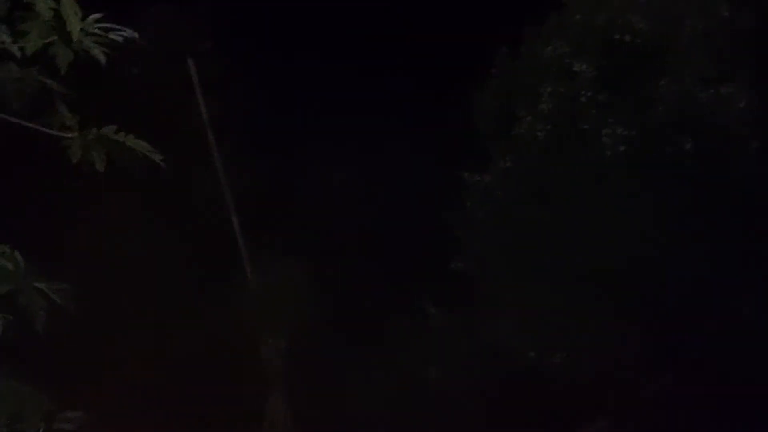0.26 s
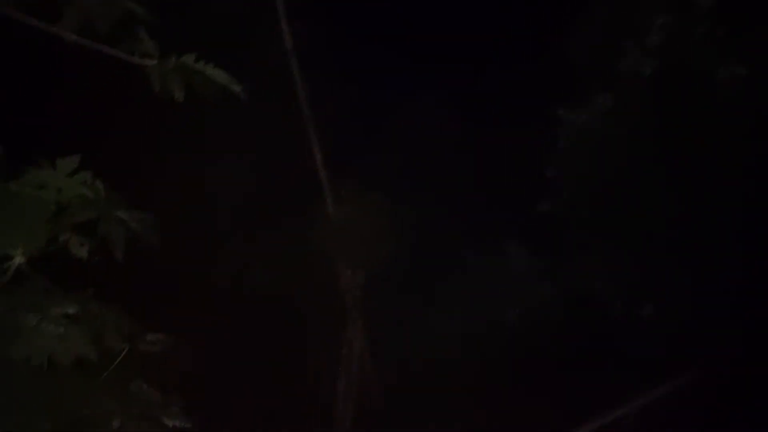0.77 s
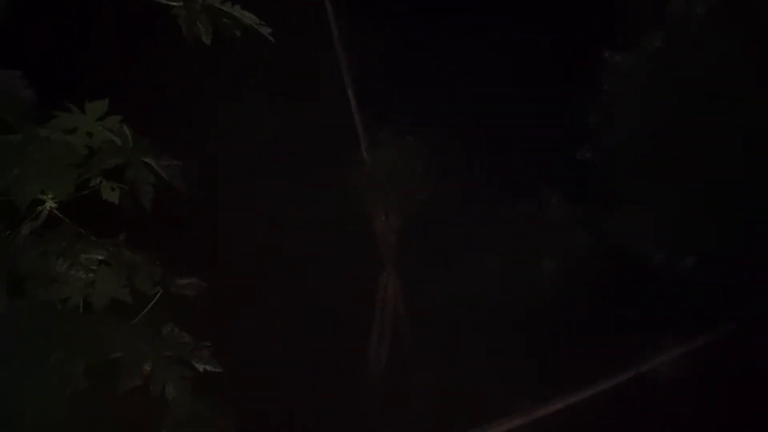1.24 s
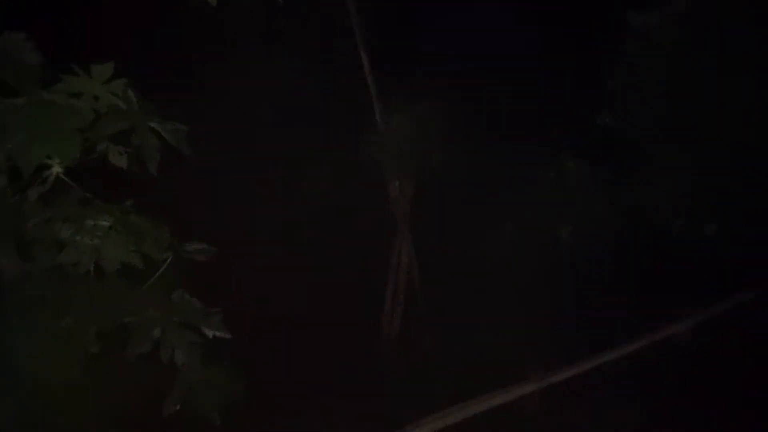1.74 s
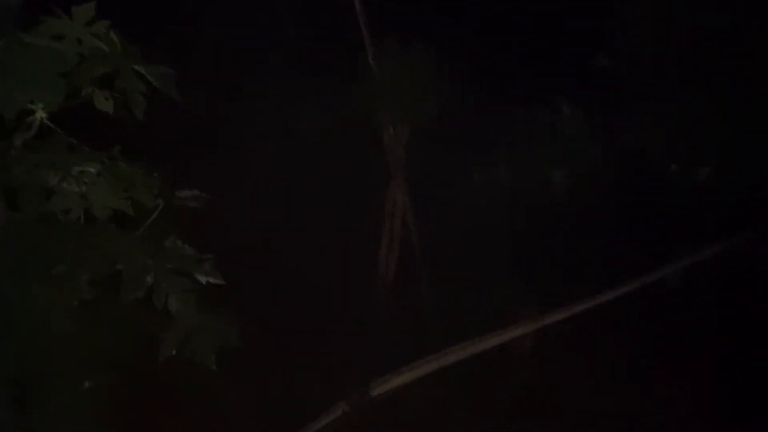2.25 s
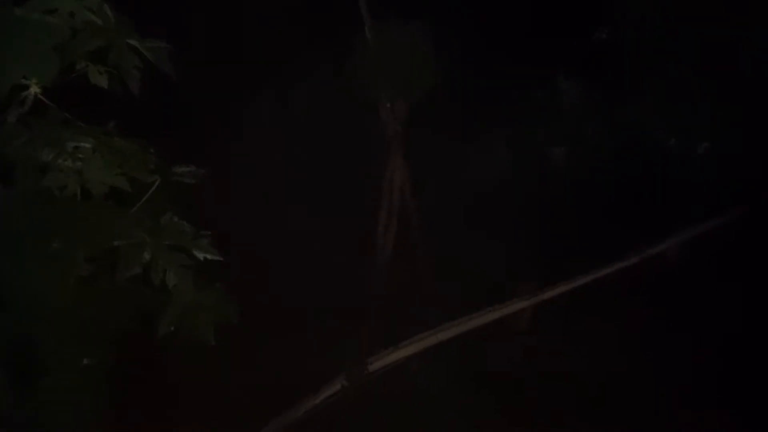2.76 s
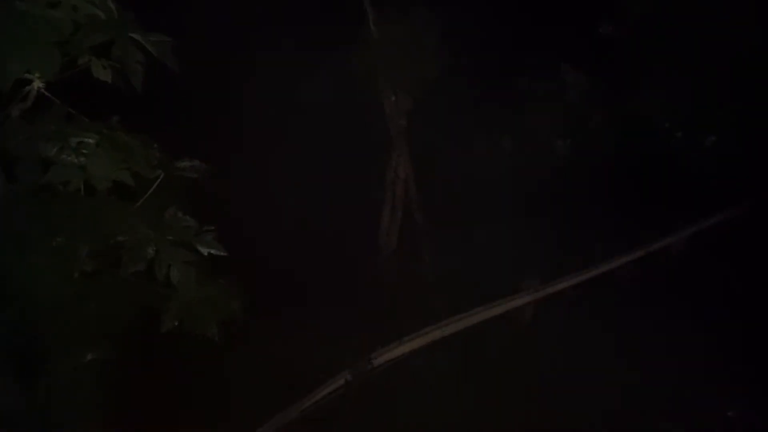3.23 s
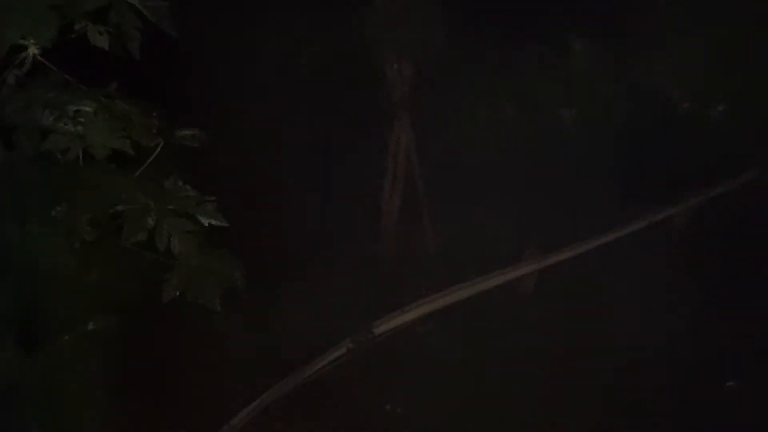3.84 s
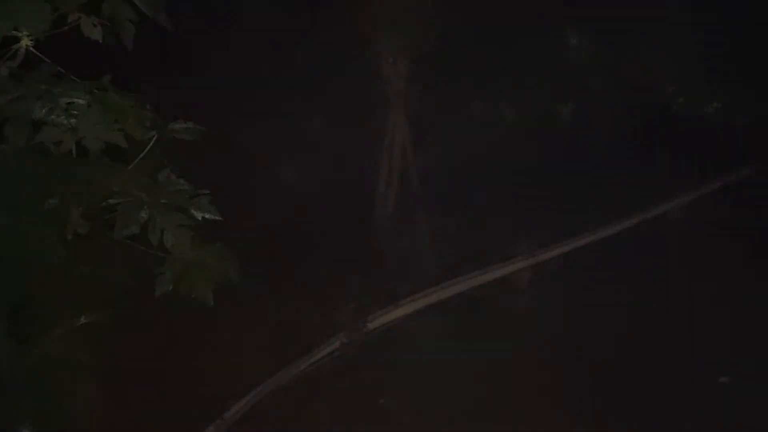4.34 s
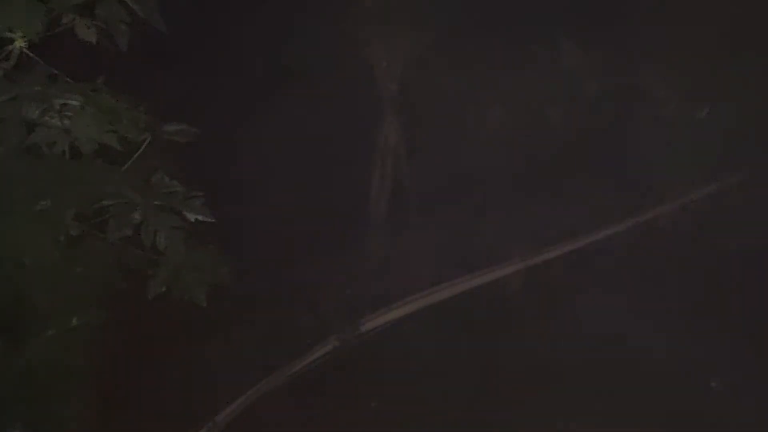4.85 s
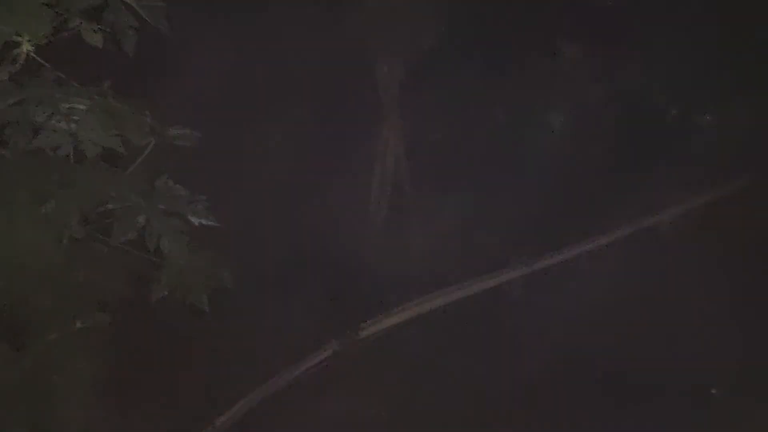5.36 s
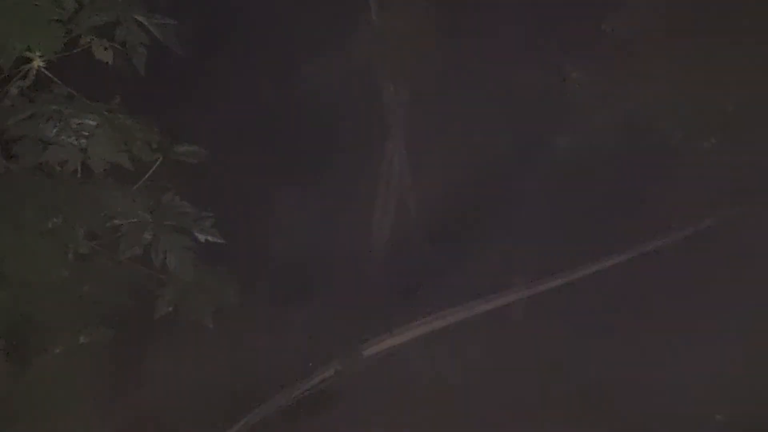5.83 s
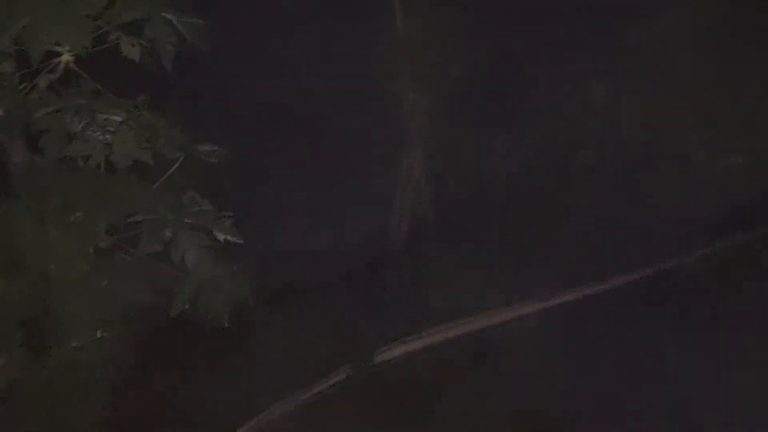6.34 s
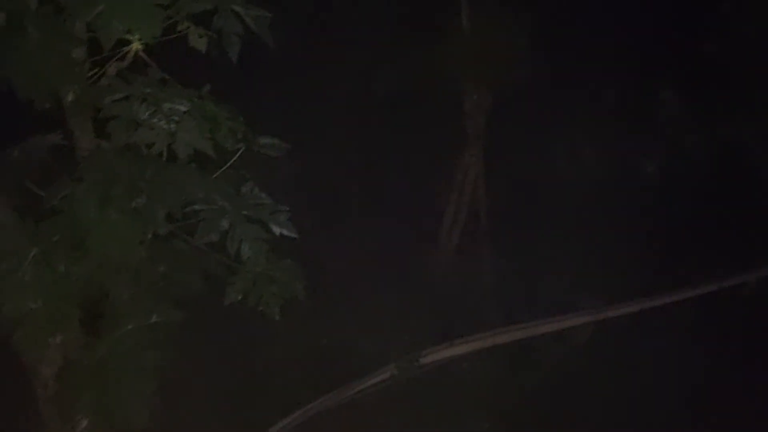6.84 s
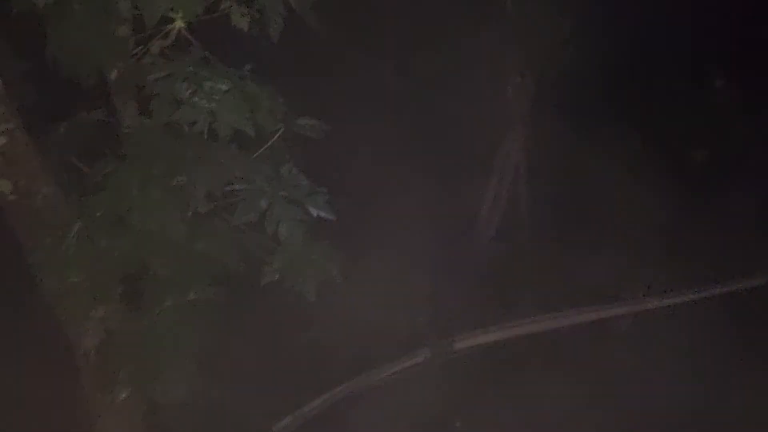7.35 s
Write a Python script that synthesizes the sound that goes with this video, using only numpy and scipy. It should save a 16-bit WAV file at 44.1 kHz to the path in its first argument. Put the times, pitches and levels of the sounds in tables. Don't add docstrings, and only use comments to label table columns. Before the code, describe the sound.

Night in a leafy garden, with a low machine hum throbbing about three times a second under air hiss and a blurred far cricket chorus. A loud buzz opens, with pairs and threes of clear peeps until 0.8 s. From 0.6 to 1.4 s a fast, slightly distant trill sounds; it returns nearer at 1.9-3.0, 3.5-5.0 and 5.4-7.1 s. Piercing four-stroke chirps alternate between two high crickets at about 0.9, 1.7, 3.3, 4.0, 5.7 and 6.3 s. Dry, papery katydid rasps scratch irregularly throughout. A middle-high chirper gives short falling strokes from 2.0 to 3.0 s. Quick sharp ticks come at 4.3-4.6 s, as the hum swells and a soft far knock sounds; buzzing pulses strengthen until 7.1 s. Faint peeps at 5.0-5.4 s return loudest at 7.1-7.5 s beside a thin passing trill. Soft low fluttering notes recur throughout. Most near singers lean right.

```python
import sys
import numpy as np
from scipy import signal
from scipy.fft import rfft, irfft, next_fast_len
from scipy.io import wavfile

SR = 44100
rng = np.random.default_rng(int(sys.argv[2]) if len(sys.argv) > 2 else 0)


def wrap_up_sound(samples):
    columns = np.atleast_2d(samples).T
    tamed = np.clip(columns, -1, 1)
    steps = np.round(tamed * 32767).astype(np.int16)
    wavfile.write(sys.argv[1], SR, steps)


def voltage_ratio(decibels):
    exponent = np.asarray(decibels, float) / 20
    return 10 ** exponent


N = 334703
TIME = np.arange(N) / SR
FAST = next_fast_len(N)

# (frequency [Hz], density [dB per Hz])
AIR_SPECTRUM = [(25, -41), (40, -13), (118, -6.5), (300, -14), (600, -24), (1130, -30), (2550, -35.5),
                (4000, -31.5), (7000, -24), (12000, -22), (16000, -31)]
# (frequency [Hz], left minus right [dB])
BACKGROUND_BALANCE = [(60, -9), (110, -6), (200, -2.5), (380, 0), (700, 0.5), (1290, 0), (2380, 9),
                      (4400, 2), (8120, -6), (15000, -14)]
# (frequency [Hz], width [Hz], level [dB])
HUM_LINES = [(50.2, 6, -73), (96, 30, -72.5), (126.4, 11.3, -68.5), (201.8, 14, -79.5), (257, 19.4, -78)]
# (frequency [Hz], throb rate [1/s], first peak [s], depth [0-1])
MACHINE_THROB = (104.1, 3.03, .075, .6)
# (time [s], level [dB])
MACHINE_LOAD = [(0, 4.5), (.3, 0.5), (1.0, 2), (1.5, -0.9), (3.6, -1.5), (4.35, 6.5), (5.0, -2),
                (5.8, -2.5), (6.4, 3.5), (7.3, -6), (7.59, -1)]
# (centre [s], level [dB])
KNOCKS = [
    (4.5, -61.5),
    (6.75, -62.5),
]
# (frequency [Hz], width [Hz], stroke rate [1/s], level [dB], left minus right [dB])
CHORUS_SINGERS = [(9324, 1010, 128, -58.5, -4.5), (4674, 490, 45, -66.5, -16), (5430, 1200, 60, -64.5, -8),
                  (4320, 1200, 63, -71, 3), (6300, 720, 87, -73.5, -6), (2100, 570, 40, -83, -7)]
# (time [s], level [dB])
FAR_TRILLERS = [(0, -60), (.46, -68), (.85, -56.5), (1.1, -61), (1.77, -70), (2.0, -59), (2.9, -64.5),
                (3.06, -73.5), (3.45, -70.5), (3.55, -59), (4.7, -65.5), (5.32, -63.5), (5.6, -65),
                (7.1, -59), (7.3, -78), (7.59, -71.5)]
# (first [s], last [s], gap [ms], level [dB])
BUZZ_RUNS = [
    (-.014, -.014, 270, -50),
    (.338, 1.511, 390, -69),
    (1.941, 3.902, 280, -69),
    (4.366, 4.366, 270, -54.5),
    (4.607, 5.432, 275, -53),
    (5.691, 6.499, 269, -51),
    (6.778, 7.064, 286, -54),
]
# (centre [s], level [dB])
FAR_CHIRPS = [(.02, -56), (.3, -60), (.56, -61), (.82, -56.5), (1.05, -58.5), (7.12, -65), (7.55, -73)]
# (centre [s], level [dB])
TREE_NOTES = [(0.151, -64), (0.397, -70), (0.729, -65.5), (0.999, -69), (1.329, -66), (1.65, -76.5),
              (1.982, -77), (2.325, -71), (2.663, -68), (2.976, -75), (3.261, -76), (3.63, -72),
              (3.919, -73.5), (4.236, -71), (4.587, -70.5), (4.895, -71), (5.232, -72), (5.54, -67),
              (5.858, -69.5), (6.18, -64), (6.494, -73), (6.749, -70), (7.04, -74), (7.376, -75)]
# (centre [s], level [dB], length [s])
THIN_TRILL = (7.17, -62, 0.34)
# (first [s], last [s], gap [ms], level [dB], left minus right [dB])
PEEP_RUNS = [
    (.022, .154, 132, -52, -7.5),
    (.283, .412, 129, -49, -7),
    (.543, .81, 133, -46.5, -11),
    (5.03, 5.15, 120, -55, -9),
    (5.223, 5.359, 136, -52, -11),
    (7.1, 7.234, 134, -43.5, -12.5),
    (7.369, 7.501, 132, -45.5, -13),
]
# (centre [s], level [dB], length [s], outer resonances relative to the middle [dB])
RASPS = [(0.034, -62, 0.18, 4), (0.297, -55.5, .12, 1), (.444, -64, 0.11, 3), (.808, -43, 0.18, -5.5),
         (.928, -40.5, 0.091, -3), (1.02, -45, 0.094, -2.5), (1.478, -42.5, 0.11, 6), (1.673, -56, .11, -2),
         (1.814, -56, .071, -6), (1.934, -46, 0.14, 0), (2.095, -57, 0.24, 1.5), (2.365, -47.5, 0.18, -4),
         (2.644, -42, 0.11, -4.5), (3.272, -42, .12, 6.5), (3.442, -44.5, .12, -11), (3.619, -45, 0.18, -2),
         (3.901, -47, 0.19, -4.5), (4.367, -47.5, .11, -6), (4.737, -54, 0.15, -2.5),
         (4.914, -42.5, 0.19, -6), (5.52, -41.5, 0.14, -6.8), (6.001, -40, .12, 3), (6.17, -47, 0.14, -2.5),
         (6.334, -47, 0.14, -4), (6.407, -51.5, 0.18, 2), (6.697, -45.5, 0.15, -12),
         (7.14, -48.5, 0.063, -9.5), (7.37, -63, 0.1, 0)]
# (centre [s], level [dB], length [s])
SMALL_RASPS = [
    (1.31, -46, 0.11),
    (1.383, -46.5, 0.086),
    (2.904, -66, 0.16),
    (4.405, -62, .08),
]
# (first [s], last [s], gap [ms], level [dB], left minus right [dB])
TRILL_RUNS = [(.636, .936, 33, -46.5, -3.5), (.98, 1.158, 36, -45.5, -4), (1.204, 1.389, 46, -46.5, -5),
              (1.937, 2.348, 34, -45, -11), (2.382, 2.492, 37, -43.5, -12), (2.536, 2.723, 47, -45, -10),
              (2.76, 2.953, 39, -45, -7), (3.007, 3.007, 50, -49, -4), (3.456, 3.93, 34, -45, -11),
              (3.967, 4.359, 39, -44, -10.5), (4.396, 4.784, 35, -44.5, -11.5),
              (4.821, 4.922, 50, -44.5, -11.5), (4.969, 5.022, 53, -55.5, -10),
              (5.426, 5.661, 34, -43.5, -11), (5.697, 5.975, 35, -41.5, -10), (6.015, 6.17, 39, -41, -11),
              (6.223, 6.321, 49, -41.5, -15), (6.363, 6.605, 35, -41, -13.5),
              (6.643, 6.785, 35, -41.5, -12), (6.824, 6.964, 35, -43, -11), (7.009, 7.009, 50, -45.5, -10),
              (7.072, 7.117, 45, -45.5, -9)]
# (first stroke [s], level [dB], left minus right [dB])
HIGH_CHIRPS = [
    [(.873, -31, -13), (3.321, -32.5, -12.5), (5.74, -31, -13)],
    [(1.718, -37.5, -4), (4.038, -34, -7.5), (6.337, -33, -9)],
]
HIGH_CHIRP_RISE = (-15.5, -7, -1.7, -0.9)
# (first [s], last [s], gap [ms], level [dB], left minus right [dB])
MIDDLE_CHIRPS = [
    (2.018, 2.018, 50, -48, -10),
    (2.166, 2.267, 50, -46.5, -6.5),
    (2.409, 2.511, 50, -46, -6),
    (2.656, 2.757, 50, -44.5, -8),
    (2.905, 2.955, 50, -45.5, -11),
]
# (first [s], last [s], gap [ms], peak [dB], left minus right [dB])
TICK_RUNS = [
    (4.3398, 4.3398, 72, -39, -10),
    (4.4106, 4.6261, 72, -34.5, -13),
]


def level(x, db):
    return x * voltage_ratio(db) / np.sqrt(np.mean(x ** 2))


def band(x, hz, width_hz):
    f = np.fft.rfftfreq(FAST, 1 / SR)
    response = 1 / (1 + np.abs(2 * (f - hz) / width_hz) ** 3)
    return irfft(rfft(x, FAST) * response, FAST)[..., :N]


def resonant_noise(hz, width_hz, db):
    return level(band(rng.standard_normal(N), hz, width_hz), db)


def log_curve(f, table):
    hz, db = np.transpose(table)
    return np.interp(np.log(f), np.log(hz), db)


def sides(pan_db):
    left = voltage_ratio(np.asarray(pan_db, float))
    return np.array([left, np.ones_like(left)]) / np.sqrt(1 + left ** 2)


def walk(rate):
    return resonant_noise(0, rate, 0)


def runs(table):
    rows = []
    for first, last, gap_ms, *rest in table:
        count = round(abs(last - first) * 1000 / gap_ms) + 1
        rows += [(s, s - first, *rest) for s in np.linspace(first, last, count)]
    return np.transpose(rows)


def swells(s, db, length):
    out = np.zeros(N)
    for at, d, n in zip(s, db, length + 0 * s):
        near = slice(max(int((at - n / 2) * SR), 0), int((at + n / 2) * SR))
        out[near] += voltage_ratio(d) * np.cos(np.pi * (TIME[near] - at) / n) ** 2
    return out


def teeth(rate, jitter, scatter_db):
    chance = rng.standard_normal((int(1.2 * rate * N / SR), 2)).T
    spacing, height = np.clip(chance, -2, 2)
    at = (np.cumsum(1 + jitter * spacing) * SR / rate).astype(int)
    inside = at < N
    out = np.zeros(N)
    out[at[inside]] = voltage_ratio(scatter_db * height)[inside]
    return out


def strokes(s, db, pan_db, top_hz, fall_hz, length, octave_db, late=0., lean=0.76, vary=0.0069):
    out = np.zeros((2, N + SR))
    t = np.linspace(0, 1, int(length * SR))
    chance = rng.standard_normal((len(s), 2))
    shape = np.abs(np.sin(np.pi * t ** lean)) ** 0.87
    gains = (voltage_ratio(db) * sides(pan_db + 0 * s)).T
    for at, gain, hz, (detune, start) in zip(s, gains, top_hz + 0 * s, chance):
        cycles = length * (1 + vary * detune) * (hz * t - fall_hz * t ** 2 / 2)
        phase = 2 * np.pi * cycles + 3 * start
        tone = np.sin(phase) + voltage_ratio(octave_db) * np.sin(2 * phase)
        i = max(int((at + late - length / 2) * SR), 0)
        out[:, i:i + len(t)] += np.outer(gain, shape * tone)
    return out[:, :N]


def garden(x, echo_s, echo_db, leaves_db, t60, lag):
    t = np.arange(int(.36 * SR)) / SR
    path = rng.standard_normal((2, 2, len(t))) * 1000. ** (-t / t60) * np.clip(t / 0.0063, 0, 1)
    path *= voltage_ratio(leaves_db) / np.sqrt(np.sum(path ** 2, axis=2, keepdims=True))
    for side, late in enumerate((16 + lag, 16)):
        path[:, side, late] += 1
        echo = late + int(echo_s * SR * (1 + .05 * side))
        path[:, side, echo] += voltage_ratio(echo_db) * np.array([1, .4])
    share = .5 + .5 * np.sin(2 * np.pi * 0.4413 * TIME + 6 * rng.random())
    weighted = zip((share, 1 - share), path)
    return sum(signal.oaconvolve(x * w, p, axes=1)[:, :N] for w, p in weighted)


def machine():
    hz, rate, first, depth = MACHINE_THROB
    load_db = np.interp(TIME, *np.transpose(MACHINE_LOAD))
    throb = 1 + depth * np.cos(2 * np.pi * rate * (TIME - first))
    line = np.sin(2 * np.pi * hz * TIME) * throb * voltage_ratio(-65.5 + load_db)
    knock = np.sin(2 * np.pi * 225 * TIME) * swells(*np.transpose(KNOCKS), 0.17)
    hum = sum(resonant_noise(*row) for row in HUM_LINES)
    return line + knock + hum * voltage_ratio(load_db)


def background():
    f = np.fft.rfftfreq(N, 1 / SR) + 1
    shared, left, right = rfft(rng.standard_normal((3, N)))
    alike = np.clip(.75 - f / 900, 0, 1)
    noise = np.sqrt(alike) * shared + np.sqrt(1 - alike) * np.array([left, right])
    air = level(irfft(voltage_ratio(log_curve(f, AIR_SPECTRUM)) * noise, N), -62.5)
    hum = machine()
    both = air + np.array([np.roll(hum, 30), hum])
    tilt = sides(log_curve(f, BACKGROUND_BALANCE))
    return irfft(rfft(both) * tilt * np.sqrt(2), N)


def chorus():
    swell = voltage_ratio(np.interp(TIME, *np.transpose(FAR_TRILLERS)))
    out = resonant_noise(3207, 365, 2.3) * swell * sides(-3.0)[:, None]
    for hz, width_hz, rate, db, pan in CHORUS_SINGERS:
        train = level(teeth(rate, .04, 1.7), 0) * rng.standard_normal(N)
        song = band(train + 1.12 * rng.standard_normal(N), hz, width_hz)
        swell = voltage_ratio(.7 * walk(1.6))
        out = out + level(song, db) * swell * sides(pan)[:, None]
    return garden(out, 0.0053, -16.0, 5.88, 0.41, lag=11) * voltage_ratio(-2)


def buzzing_cricket():
    s, _, db = runs(BUZZ_RUNS)
    upper = band(teeth(56, 0.037, 0.61), 3990, 180)
    lower = band(teeth(56, 0.073, 2.0), 3640, 220)
    buzz = level(band(upper + voltage_ratio(-6) * lower, 3860, 600), -5.5)
    buzz += resonant_noise(3834, 300, -5.0)
    return buzz * np.minimum(1.74 * swells(s - .015, db, 0.22), swells(s, db, 0.47))


def far_cricket():
    return level(band(teeth(300, .4, 4), 5150, 890), 0) * swells(*np.transpose(FAR_CHIRPS), 0.32)


def tree_cricket():
    s, db = np.transpose(TREE_NOTES)
    flutter = np.sin(2 * np.pi * 2200 * TIME + 2.25 * walk(33)) * (1 + 0.28 * walk(41))
    return level(flutter, -0.5) * swells(s - .012, db, 0.16)


def thin_trill():
    return level(band(teeth(45, 0.051, 2.5), 5790, 70), 0) * swells(*np.transpose([THIN_TRILL]))


def buzzers():
    song = buzzing_cricket() * sides(-2.5)[:, None]
    song = song + (far_cricket() + thin_trill()) * sides(-15)[:, None]
    song = song + tree_cricket() * sides(-13.5)[:, None]
    return garden(song, 0.0052, -20, 0.073, 0.27, lag=3)


def peeper():
    s, _, db, pan = runs(PEEP_RUNS)
    peep = strokes(s, db, pan, 3355, 30, 0.04, -26, vary=0.0062)
    return garden(peep, .038, -10.0, -1.3, 0.082, lag=-14)


def katydid_rasps():
    s, db, length, outer_db = np.transpose(RASPS)
    small = swells(*np.transpose(SMALL_RASPS))
    file = level(teeth(1100, .4, 3.7), 0) + 0.54 * rng.standard_normal(N)
    body = level(band(file, 8370, 1940) + voltage_ratio(2) * band(file, 7770, 2000), 0)
    middle = level(band(file, 10800, 3100), 0)
    top = level(band(file, 14060, 3400), 0)
    rasp = middle * (swells(s, db - 6.5, 1.28 * length) + voltage_ratio(-10) * small)
    rasp += top * (swells(s, db + outer_db - 4, 1.1 * length) + small)
    rasp += body * swells(s, db + 0.71 * outer_db - 6, 1.3 * length)
    return garden(rasp * sides(-8)[:, None], 0.0018, -14, 1.6, 0.37, lag=-14)


def trill_strokes():
    s, _, db, pan = runs(TRILL_RUNS)
    chance = rng.standard_normal((len(s), 2)).T
    rested = np.maximum.accumulate(np.where(np.diff(s, prepend=0) > .3, s, 0))
    db = db - 4.5 * np.exp(-(s - rested) / 0.065) + 1.25 * chance[0]
    return s + .0008 * chance[1], db, pan


def triller():
    s, db, pan = trill_strokes()
    trill = strokes(s, db + 5.5, pan, 3459.5, 496, 0.0105, -48, late=0.001498, lean=1.0, vary=0.0076)
    trill += strokes(s, db - 4.0, pan, 3450, 165, 0.016, -48, late=-0.012, lean=1.37, vary=0.0071)
    duet = (s > .65) & (s < 1.11)
    trill += strokes(s[duet] + .017, db[duet] - 2.0, -2, 3500, 258, .022, -48, vary=0.011)
    trill += resonant_noise(2820, 130, -30) * swells(s, db, 0.083)
    trill = band(band(trill, 3240, 640), 3260, 800) + .3 * band(trill, 2780, 130)
    distant = TIME < 1.7
    near_song = garden(trill * ~distant, 0.0093, -6.5, -1.0, 0.33, lag=15)
    far_song = garden(trill * distant, 0.017, -4.5, -0.84, 0.28, lag=-15)
    return near_song + voltage_ratio(-1.0) * far_song


def high_chirp(who):
    first, db, pan = np.transpose(HIGH_CHIRPS[who])
    k = np.arange(4)[:, None]
    gap_s = (.0445, .047)[who]
    s = first + k * gap_s + .0012 * k * (k - 1) / 2
    return s, db + np.array(HIGH_CHIRP_RISE)[k], pan - 1.1 * (3 - k)


def high_chirpers():
    out = 0
    singers = ((0, 6625, 0.0046, -5, -16), (1, 6724, 0.0041, -3.5, 19))
    for who, top_hz, echo_s, leaves_db, lag in singers:
        chirp = high_chirp(who)
        s, db, pan = (v[:2].ravel() for v in chirp)
        weak = strokes(s, db + 4.5, pan, top_hz - 250, 870, 0.018, -30)
        s, db, pan = (v[2:].ravel() for v in chirp)
        strong = strokes(s, db + 6.5, pan, top_hz, 1180 - 130 * who, .026, -30, late=.0015, lean=0.91)
        out = out + garden(weak + strong, echo_s, -4.0, leaves_db, 0.27, lag=lag)
    return out


def middle_chirper():
    s, since, db, pan = runs(MIDDLE_CHIRPS)
    chirp = strokes(s, db + 0.5 - 7 * (since == 0), pan, 5560, 957, .028, -38, vary=.01)
    return garden(chirp, 0.03, -7, 6.8, 0.24, lag=-8)


def katydid_ticks():
    t = np.arange(int(.02 * SR)) / SR
    tick = np.zeros((2, N))
    ticks = runs(TICK_RUNS).T
    for (at, _, db, pan), noise in zip(ticks, rng.standard_normal((len(ticks), len(t)))):
        decay = 0.35 * np.exp(-t / 0.0006) + 0.27 * np.exp(-t / 0.0054)
        rattle = 1.6 * (t == 0) + noise * decay
        i = int(at * SR)
        tick[:, i:i + len(t)] = voltage_ratio(db + 14.5) * np.outer(sides(pan), rattle)
    treble = signal.butter(4, [12300, 15000], "band", fs=SR, output="sos")
    return garden(signal.sosfilt(treble, tick), 0.0021, -10, -1.5, 0.29, lag=10)


def scene():
    early = background() + chorus() + buzzers() + peeper() + katydid_rasps()
    return early + triller() + high_chirpers() + middle_chirper() + katydid_ticks()


def low_pass(x):
    return signal.sosfilt(signal.butter(12, 15790, fs=SR, output="sos"), x)


def record(dry):
    cut = signal.ellip(12, .2, 75, 15770, fs=SR, output="sos")
    return low_pass(signal.sosfilt(cut, dry))


dry = scene()
out = record(dry)
wrap_up_sound(out)
```